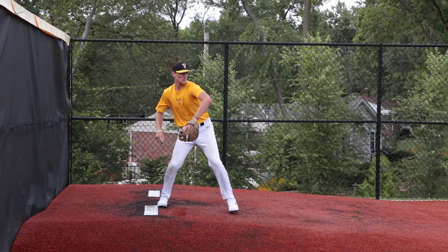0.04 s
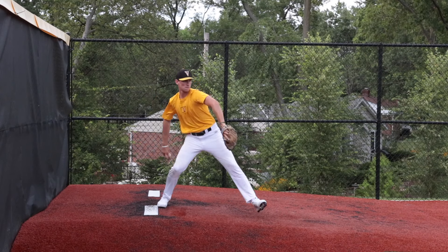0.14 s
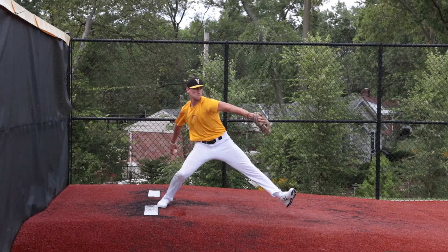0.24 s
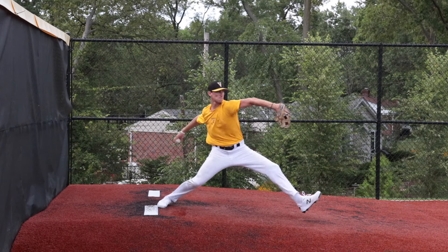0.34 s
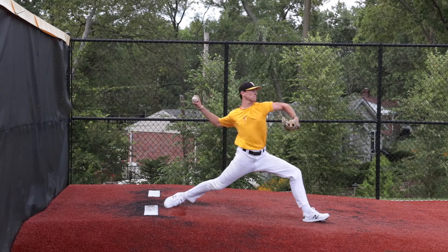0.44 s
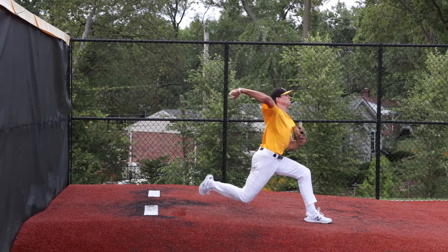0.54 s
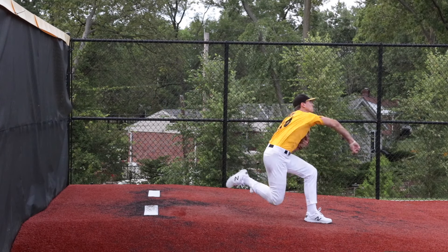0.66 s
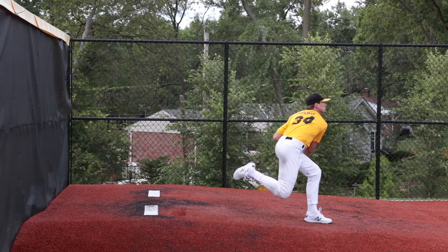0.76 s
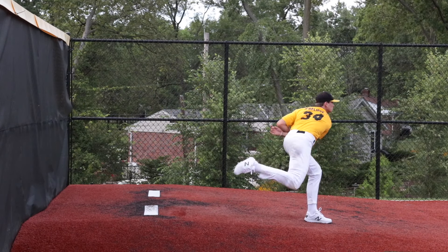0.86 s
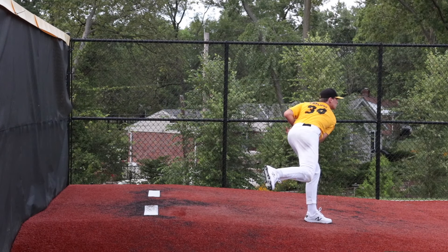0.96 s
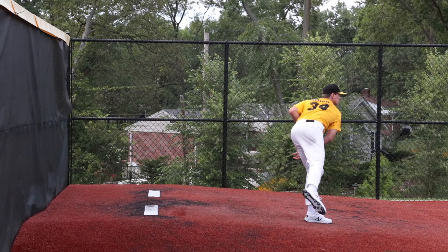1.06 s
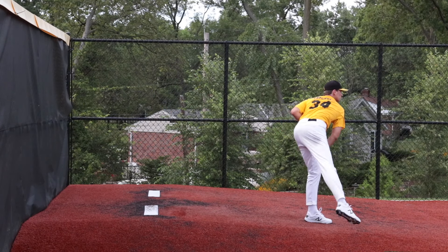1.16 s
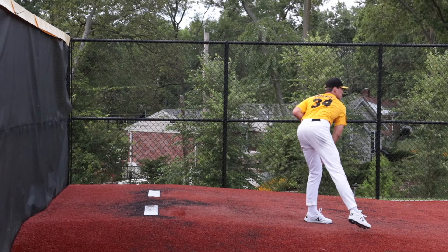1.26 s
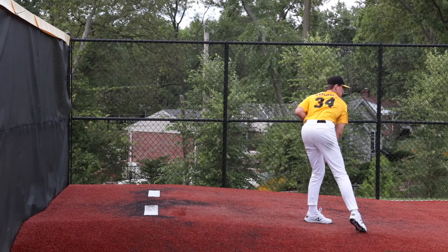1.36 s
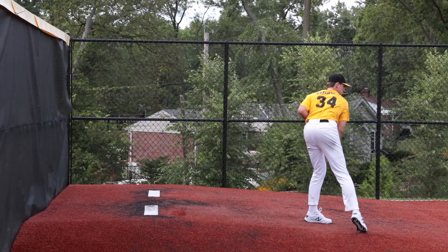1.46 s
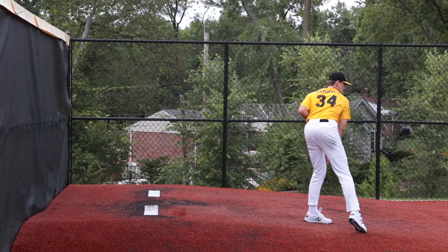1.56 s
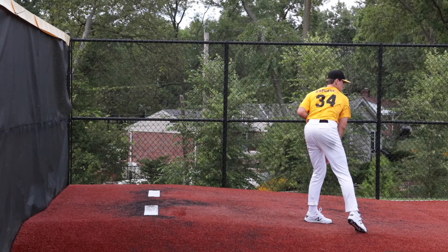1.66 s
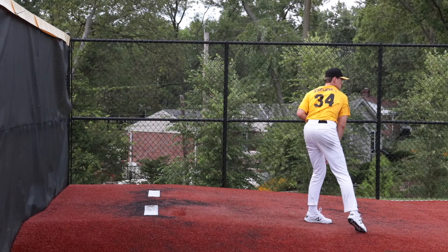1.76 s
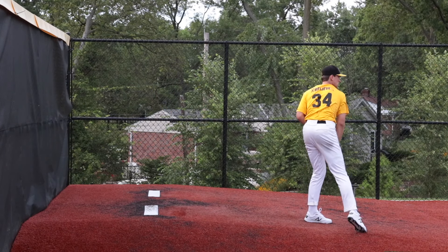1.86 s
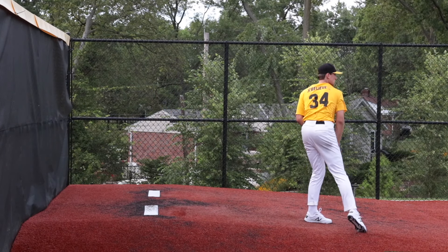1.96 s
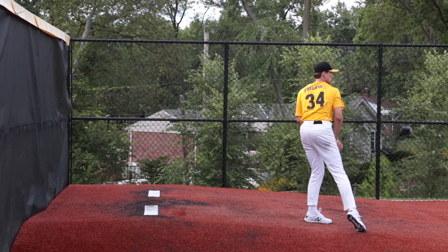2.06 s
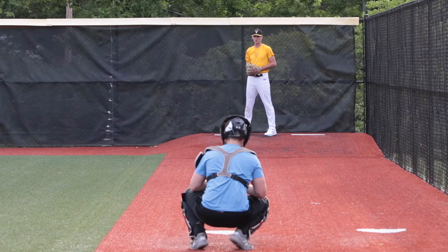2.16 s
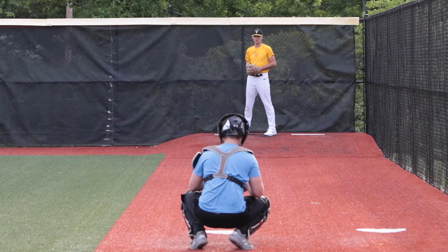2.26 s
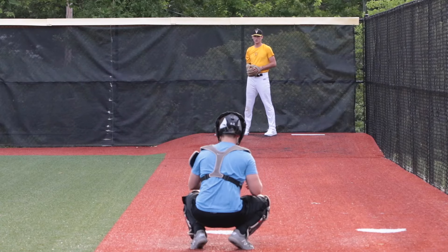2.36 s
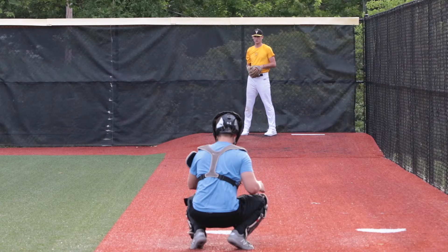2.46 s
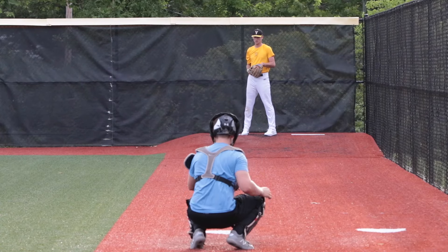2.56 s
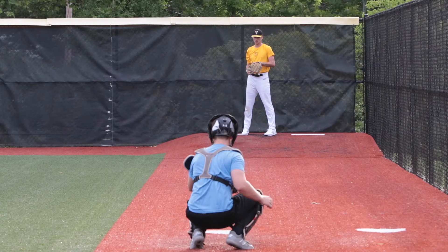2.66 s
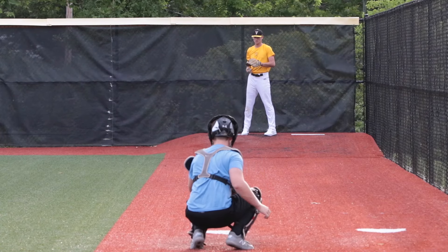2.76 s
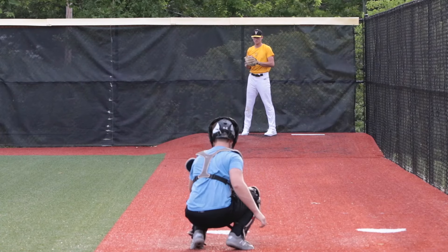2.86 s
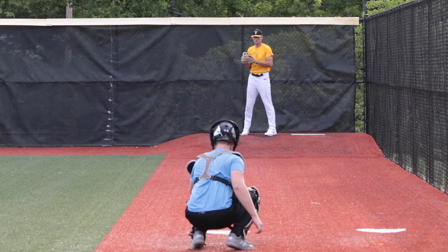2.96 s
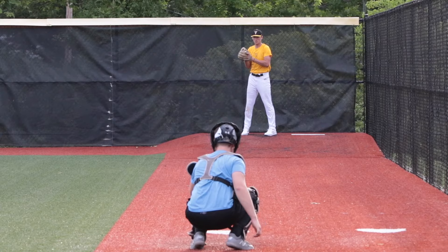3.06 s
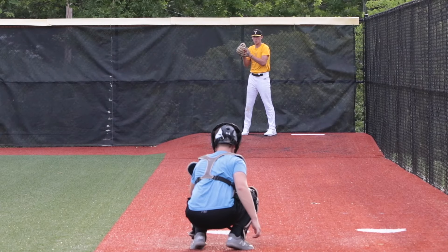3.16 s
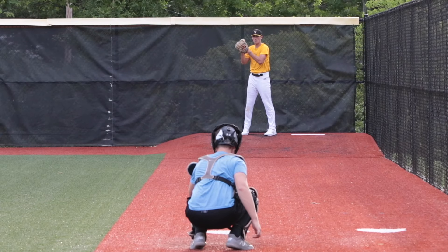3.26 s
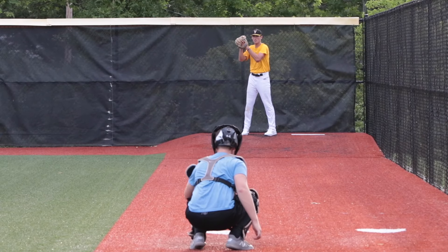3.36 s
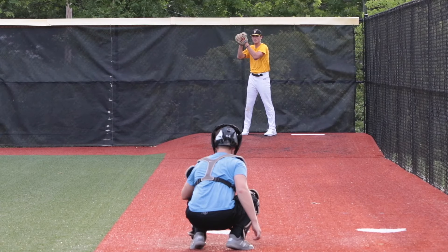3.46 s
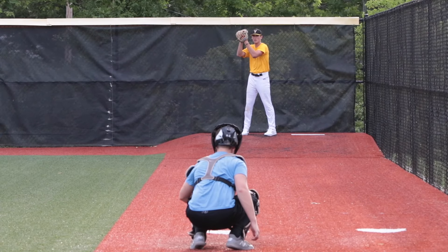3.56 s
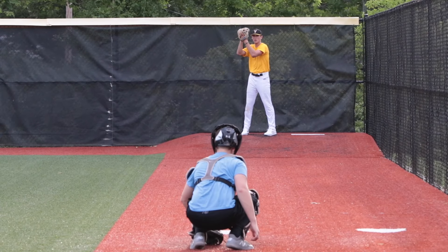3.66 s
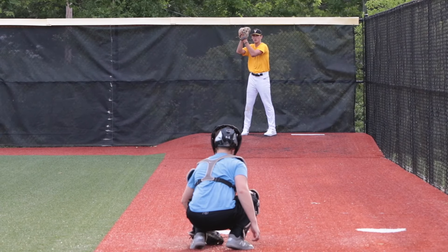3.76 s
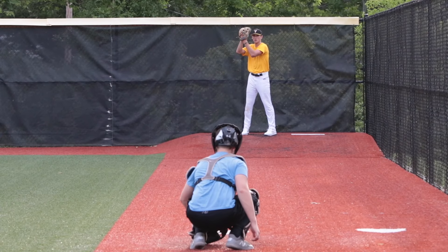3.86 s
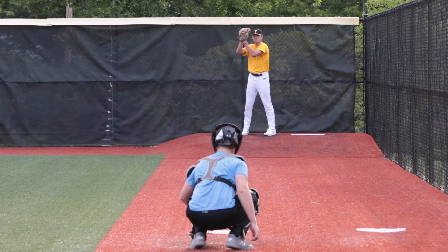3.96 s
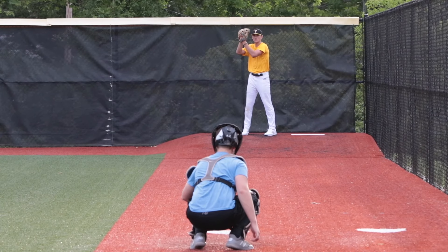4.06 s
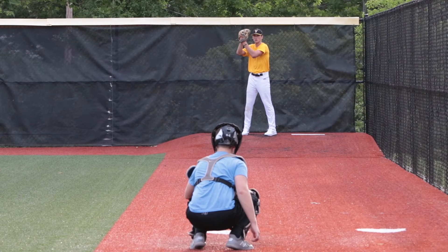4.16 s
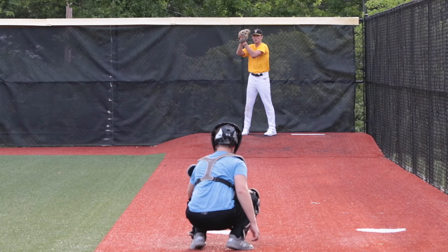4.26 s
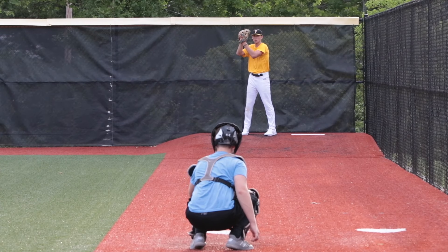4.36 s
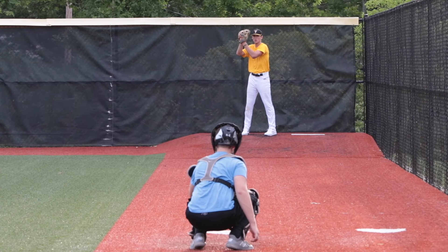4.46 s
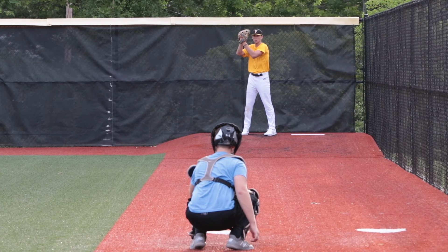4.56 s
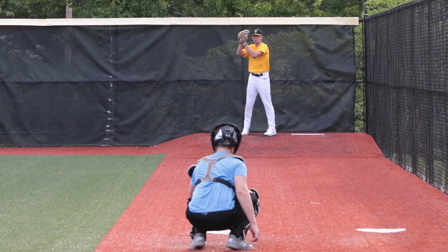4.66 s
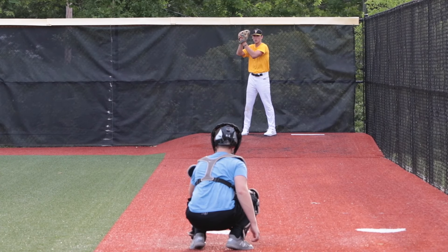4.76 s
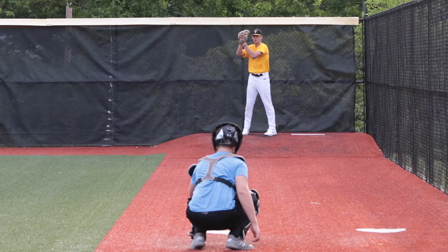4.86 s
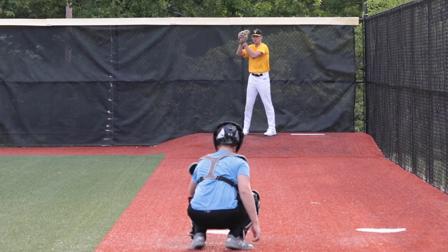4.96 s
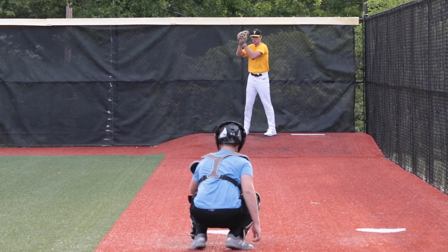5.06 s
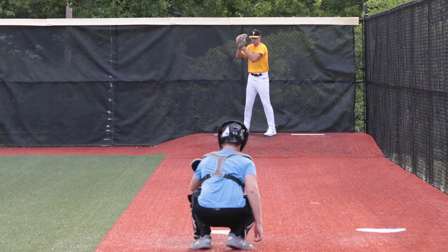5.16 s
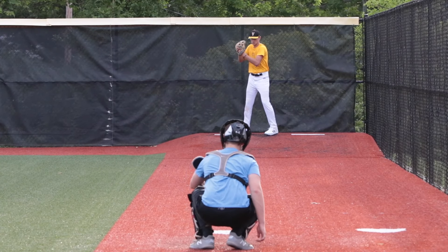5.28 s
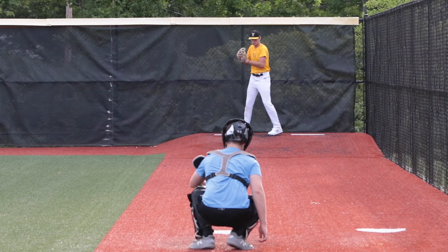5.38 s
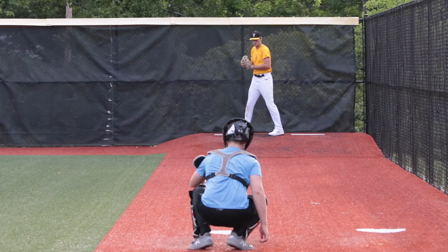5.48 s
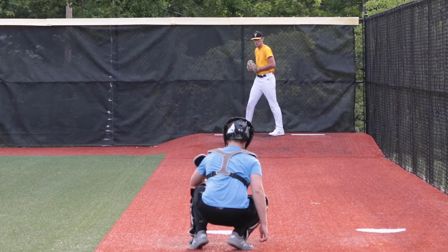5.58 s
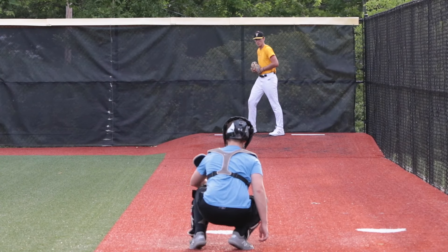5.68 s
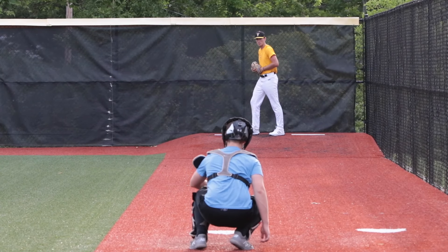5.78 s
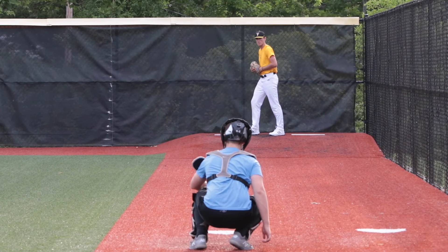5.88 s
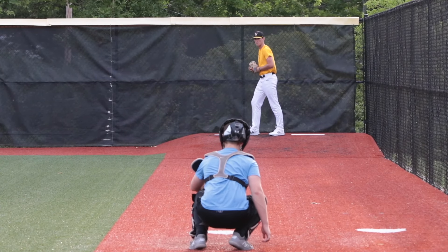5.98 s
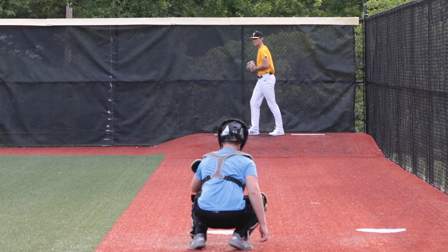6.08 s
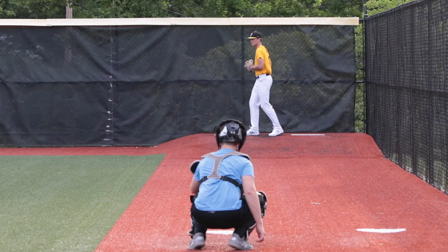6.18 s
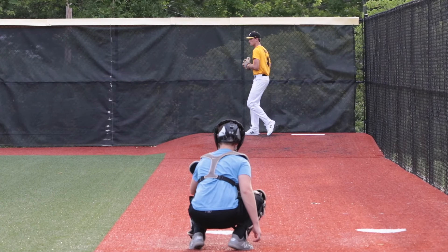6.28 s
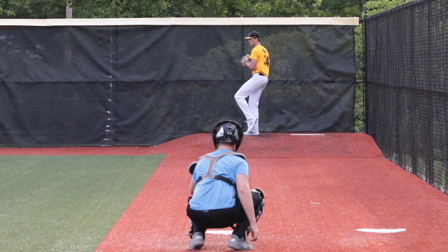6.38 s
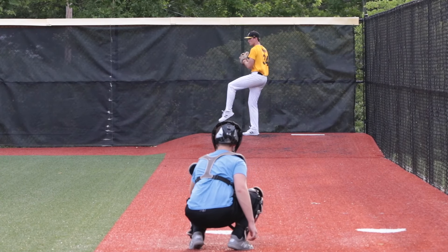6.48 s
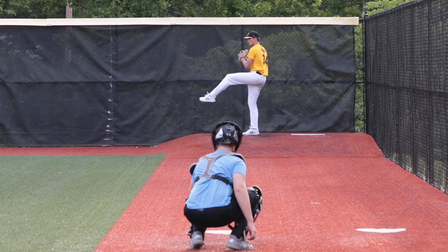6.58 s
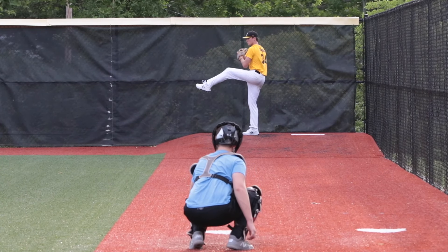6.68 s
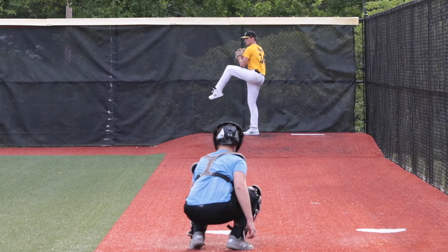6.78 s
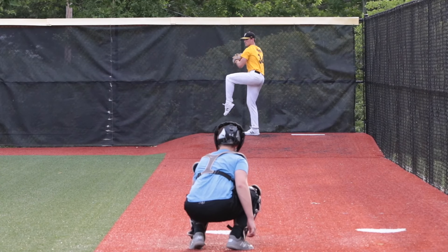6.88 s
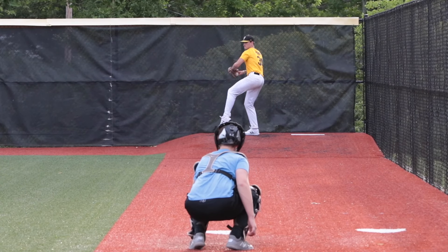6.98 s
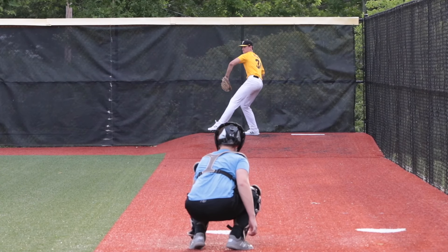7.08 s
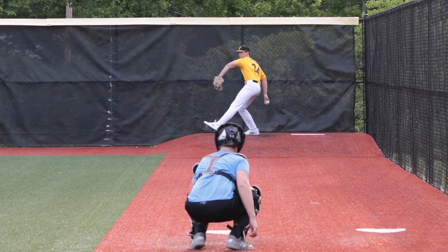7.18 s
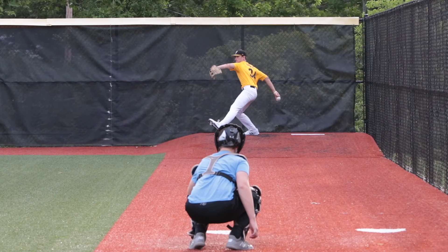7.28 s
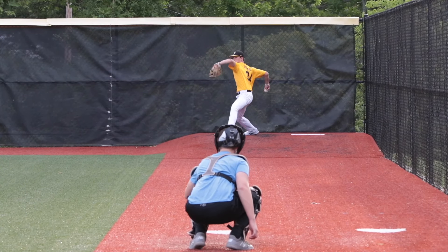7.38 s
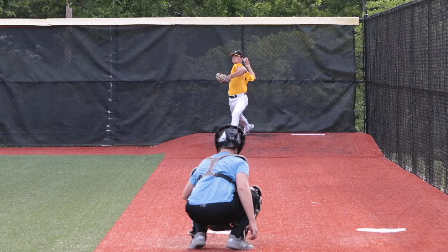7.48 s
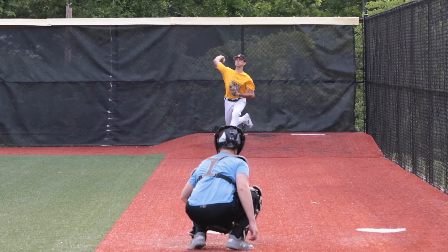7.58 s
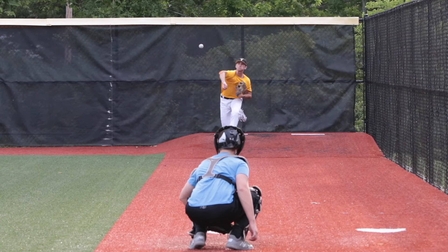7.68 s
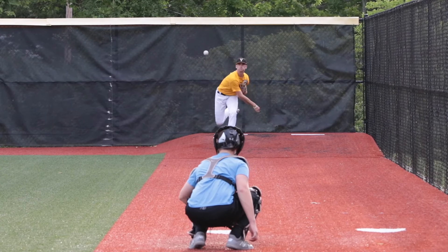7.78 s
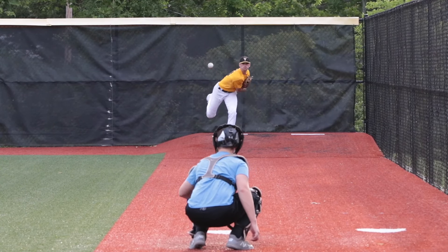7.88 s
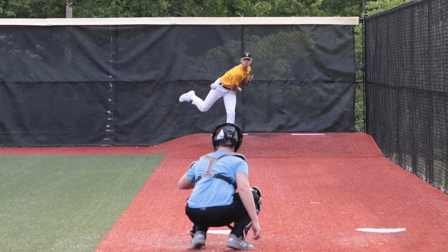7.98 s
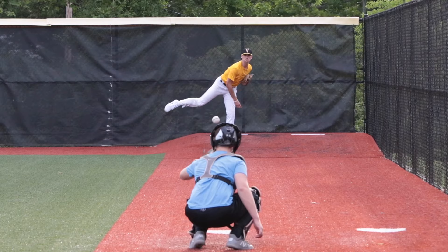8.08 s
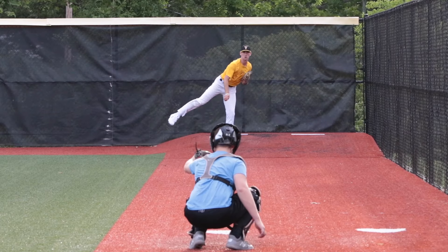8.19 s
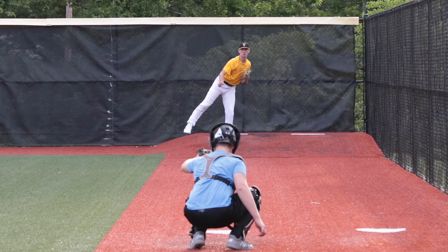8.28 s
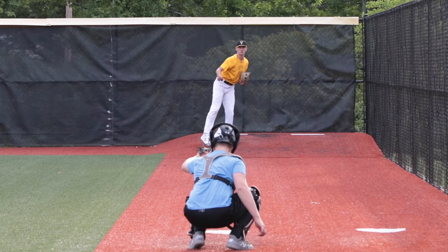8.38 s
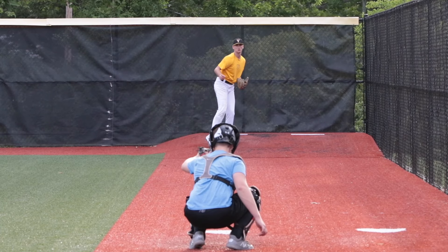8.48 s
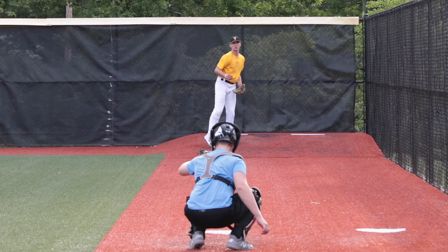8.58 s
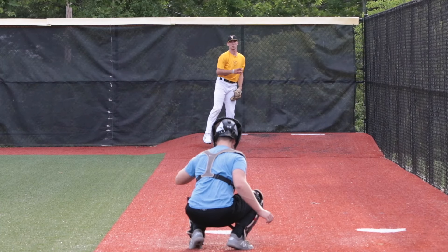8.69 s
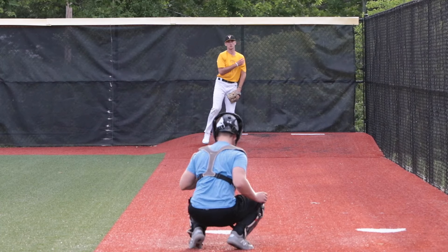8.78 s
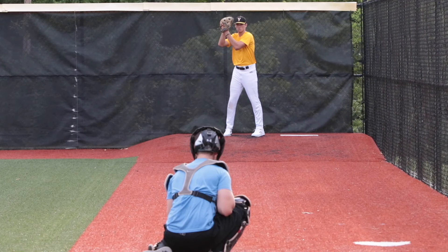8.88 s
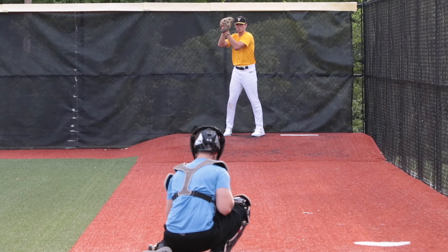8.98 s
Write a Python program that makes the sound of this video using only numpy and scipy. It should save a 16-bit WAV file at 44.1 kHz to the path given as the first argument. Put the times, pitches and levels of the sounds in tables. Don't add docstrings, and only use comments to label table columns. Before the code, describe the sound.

On a fenced ball field, a hard mitt pop, later a far bat ping and a closer pop, over pulsing cicadas and wind buffeting.

```python
import sys
import numpy as np
from scipy import signal
from scipy.io import wavfile
from scipy.ndimage import uniform_filter1d

SR = 44100
rng = np.random.default_rng(int(sys.argv[2]) if len(sys.argv) > 2 else 0)


def natural_amplitude(level_db):
    exponent = np.asarray(level_db, float) / 20
    return 10 ** exponent


def store_wav(level_fs):
    pcm = np.round(np.clip(np.atleast_2d(level_fs), -1, 1) * 32767)
    wavfile.write(sys.argv[1], SR, pcm.T.astype(np.int16))


N = 398663
CUT_S = 2.17


def evened(x):
    return x / np.sqrt(np.mean(x ** 2) + 1e-20)


def read(points, hz):
    f, value = np.transpose(points)
    return np.interp(np.log(hz + 1), np.log(f + 1), value)


def add(mix, start_s, sound):
    part = mix[round(start_s * SR):][:len(sound)]
    part += sound[:len(part)]


def resonate(x, hz, width_hz):
    turn = np.exp(2j * np.pi * np.cumsum(hz * np.ones(len(x))) / SR)
    r = np.exp(-np.pi * width_hz / SR)
    return 2 * (turn * signal.lfilter([1 - r], [1, -r], x / turn + 1e-18)).real


def drift(length_s, count=N):
    span = max(int(length_s * SR), 1)
    noise = rng.standard_normal(count)
    return evened(uniform_filter1d(uniform_filter1d(noise, span), span))


def strikes(blows, modes, order):
    out, t = np.zeros(N), np.arange(SR // 8) / SR
    for start_s, db, dull_db in blows:
        ring = np.zeros(len(t))
        for hz, mode_db, crest_s in modes:
            level = natural_amplitude(mode_db - dull_db * np.log2(hz / 1500))
            swell = (t / crest_s * np.exp(1 - t / crest_s)) ** order
            ring += level * swell * np.cos(2 * np.pi * hz * (t - crest_s))
        add(out, start_s, -natural_amplitude(db) * ring)
    return out


# start in seconds, level in dB, dullness in dB per octave.
FAR_BLOWS = [
    (1.2801, -1.5, 1.2),
    (1.2885, -17, 1.2),
]
NEAR_BLOWS = [
    (8.2981, -16, 2),
    (8.3002, -.7, 2.9),
    (8.3063, -17, 4),
]
# frequency in Hz, level in dB, time to the crest in seconds.
FAR_MITT = [(227, -16.5, 0.004), (380, -26, 0.0013), (790, -16, 0.00092), (1600, 0.5, 0.000885),
            (2770, -6.5, .0008), (4490, -5, 0.00096), (5340, -0.5, 0.00103), (6500, -4.5, 0.000757),
            (8250, -11, 0.00078), (10000, -14, 0.00077), (12000, -13, 0.00068), (14800, -23, 0.00061)]
NEAR_MITT = [(810, -10, 0.00056), (1300, -4.5, 0.0007), (3860, -10.5, 0.00057), (5170, -14, 0.00052),
             (7260, -15.5, .0005), (10200, -24, .0005), (13500, -42, .0005)]


def catches():
    return strikes(FAR_BLOWS, FAR_MITT, order=4) + strikes(NEAR_BLOWS, NEAR_MITT, order=4)


# start in seconds, level in dB, dullness in dB per octave.
PALM_BLOW = [
    (8.2985, 0, 0),
]
POCKET_BLOW = [
    (8.3012, -25, 0),
]
# frequency in Hz, level in dB, time to the crest in seconds.
PALM = [(324, -13.5, 0.003), (190, -20.5, 0.0037)]
POCKET = [(3900, 0.5, .002), (2400, -6, .0015), (370, 4, .005), (230, 1.5, .005), (950, 5, .002)]


def palm_and_pocket():
    return strikes(PALM_BLOW, PALM, order=4) + strikes(POCKET_BLOW, POCKET, order=2)


# start in seconds, level in dB, dullness in dB per octave.
PINGS = [
    (6.0455, -19, 2),
    (6.0467, -13.5, 0.6),
]
# frequency in Hz, level in dB, time to the crest in seconds.
BAT = [(1200, -21, 0.0052), (2900, -5.5, 0.00047), (3500, -8, 0.00042), (4350, -12, .0005),
       (5200, -7, .0005), (5720, -0.5, 0.00061), (7000, -20, .0006)]


def bat():
    return strikes(PINGS, BAT, order=1)


# start in seconds, level in dB, dullness in dB per octave.
FOOTFALL = [
    (.704, -36, 0),
]
# frequency in Hz, level in dB, time to the crest in seconds.
MOUND = [(410, 0.5, .008), (250, -9, .008)]


def footfall():
    return strikes(FOOTFALL, MOUND, order=2)


def burst(out, start_s, rise_s, t60_s, hz, width_hz, db):
    t = np.arange(SR // 2) / SR
    noise = rng.standard_normal(len(t))[:int(1.5 * t60_s * SR)]
    noise = resonate(resonate(noise, hz, width_hz), hz, 2 * width_hz)
    noise = evened(resonate(noise, hz / 2, 2 * hz))
    envelope = (1 - np.exp(-t / rise_s)) * natural_amplitude(db - 60 * t / t60_s)
    add(out, start_s, noise * envelope[:len(noise)])


# start in seconds, level in dB, centre in Hz, width in Hz, t60 in seconds.
RASPS = [(1.282, -22, 5500, 4000, 0.015), (1.2802, -14, 1710, 1500, 0.016), (1.289, -28, 1810, 1600, 0.13),
         (6.0462, -35, 10000, 8000, 0.081), (6.046, -34, 2700, 1200, 0.035), (6.049, -20, 5650, 900, 0.033),
         (8.3018, -19, 1200, 1400, .025), (8.3018, -32, 4600, 1500, 0.024), (8.302, -34, 6500, 2500, 0.014),
         (8.301, -42, 9000, 9000, 0.044), (8.307, -35, 1500, 2000, .05)]


def rasps():
    out = np.zeros(N)
    for start_s, db, hz, width_hz, t60_s in RASPS:
        burst(out, start_s, .0012, t60_s, hz, width_hz, db)
    return out


# start in seconds, level in dB, centre in Hz.
ECHOES = [(1.2955, -30, 3200), (1.304, -32, 3000), (1.313, -35, 5500), (1.342, -38, 3000),
          (1.36, -31, 5800), (1.292, -31, 6500), (1.4245, -29, 1300), (1.4345, -27, 1200),
          (1.465, -40, 1800), (1.468, -33, 1200), (1.66, -36, 2000), (1.684, -37, 1800), (8.325, -33, 2600),
          (8.337, -32, 1600), (8.351, -41, 1600), (8.416, -33, 1500), (8.418, -34, 4600),
          (8.506, -39, 2000)]


def catch_echoes():
    out = np.zeros(N)
    for start_s, db, hz in ECHOES:
        burst(out, start_s, .0012, .023, hz, 1600, db)
    return out


# start in seconds, level in dB.
BAT_ECHOES = [
    (6.0812, -30.5),
    (6.1275, -32),
    (6.147, -33),
]
# centre in Hz, width in Hz, level in dB.
BAT_ECHO_BANDS = [(2950, 800, -2), (5900, 1000, 0.5)]


def bat_echoes():
    out = np.zeros(N)
    for start_s, db in BAT_ECHOES:
        for hz, width_hz, band_db in BAT_ECHO_BANDS:
            burst(out, start_s, .0012, .024, hz, width_hz, db + band_db)
    return out


# start in seconds, rise in seconds, t60 in seconds, centre in Hz, width in Hz, level in dB.
FOLIAGE = [
    (1.34, 0.013, 0.36, 3900, 2600, -33.5),
    (1.338, 0.0091, 0.37, 1200, 1200, -41.5),
    (1.38, 0.073, 0.83, 3200, 3040, -39),
    (1.411, .02, .25, 950, 700, -44),
    (6.059, .01, 0.36, 5000, 6000, -50),
    (8.311, 0.027, 0.6, 3600, 3600, -40),
    (8.461, 0.03, 0.54, 2490, 2500, -45.5),
]


def foliage():
    out = np.zeros(N)
    for start_s, rise_s, t60_s, hz, width_hz, db in FOLIAGE:
        burst(out, start_s, rise_s, t60_s, hz, width_hz, db)
    return out


# start in seconds, end in seconds, top effort in dB, blur from neighbours as noise over clicks.
PHRASES = [(-.2, .52, -52, 2.5), (.7, .95, -52, 2.5), (1.05, 1.5, -52, 2.5), (1.61, 2.1, -51, 2.5),
           (2.18, 2.22, -46, .8), (2.38, 2.91, -47, .75), (3.04, 3.15, -52, .8), (3.26, 3.6, -47, .85),
           (3.75, 4.29, -47, .7), (4.46, 4.93, -48.5, 1.4), (5.16, 5.6, -47.5, 1.6), (5.86, 6.1, -50, 1.4),
           (6.3, 6.73, -52, 1.8), (6.8, 7.8, -55, 1.8), (7.98, 8.8, -49.5, 1.8), (8.88, 9.2, -45.5, 1.8)]


def phrasing(swell_db=3.0, start_db_per_s=250, stop_db_per_s=230):
    start, end, top_db, blur = np.transpose(PHRASES)[:, :, None]
    t = np.arange(0, N / SR, .002)
    db = top_db - swell_db * np.clip((end - t) / (end - start), 0, 1)
    db = db - start_db_per_s * np.maximum(start - t, 0) - stop_db_per_s * np.maximum(t - end, 0)
    sample_s = np.arange(N) / SR
    effort_db = np.interp(sample_s, t, db.max(axis=0))
    return effort_db, np.interp(sample_s, t, blur[db.argmax(axis=0), 0])


# frequency in Hz, width in Hz, level in dB.
BODY = [(4790, 290, 1), (5055, 220, 6), (5610, 330, 6), (6000, 330, 2.5)]


def cicada(sag=0.28, resting_db=-57, clicks_hz=310):
    effort_db, blur = phrasing()
    slack = np.clip((resting_db - effort_db) / 6, 0, 1)
    turns = np.cumsum(clicks_hz * (1 + .011 * drift(.02))) / SR
    clicks = np.diff(np.floor(turns), prepend=0) * natural_amplitude(1.5 * rng.standard_normal(N))
    drive = (evened(clicks) + blur * rng.standard_normal(N)) / np.sqrt(1 + blur ** 2)
    pitch = 1 - sag * slack
    body = np.zeros(N)
    for hz, width_hz, db in BODY:
        once = resonate(drive, hz * pitch, width_hz)
        body += natural_amplitude(db) * resonate(once, hz * pitch, 2 * width_hz)
    return natural_amplitude(np.maximum(effort_db, resting_db - 0.5)) * evened(body)


# time in seconds, pitch in Hz, level in dB.
NOTES = [
    [(4.94, 4700, -61), (4.97, 4100, -60)],
    [(5.14, 3700, -58), (5.162, 4600, -55)],
    [(5.235, 3600, -58), (5.255, 4400, -55)],
    [(5.315, 3200, -62), (5.335, 3900, -62)],
    [(6.0, 3500, -59), (6.04, 4150, -54), (6.08, 4520, -55), (6.16, 4520, -55), (6.185, 4450, -66),
     (6.22, 4250, -55), (6.25, 4000, -55)],
    [(6.3, 3900, -55), (6.325, 3520, -57), (6.42, 3420, -58), (6.55, 3290, -62), (6.7, 3120, -64),
     (6.78, 3050, -70), (6.93, 2940, -68)],
]


def bird():
    out = np.zeros(N)
    for rows in NOTES:
        s, hz, db = np.transpose(rows)
        t = np.arange(s[0], s[-1], 1 / SR)
        waver = 1 + .006 * drift(.006, count=len(t))
        fade = signal.windows.tukey(len(t), min(.012 / (s[-1] - s[0]), 1))
        tone = np.sin(2 * np.pi * np.cumsum(np.interp(t, s, hz) * waver) / SR) * fade
        level_db = np.interp(t, s, db) + 1.8 * drift(.008, count=len(t))
        add(out, s[0], np.sqrt(2) * tone * natural_amplitude(level_db))
    return out


# start in seconds, length in seconds, centre in Hz, width in Hz, level in dB.
SCUFFS = [(0.49, 0.16, 670, 1500, -45.5), (.545, 0.07, 420, 65, -46), (.703, 0.022, 380, 120, -45),
          (0.701, .025, 1800, 2500, -50), (2.376, 0.3, 6900, 8500, -54), (2.618, 0.1, 11000, 5000, -63),
          (2.93, .1, 11000, 6000, -62), (5.31, 0.054, 1650, 430, -52), (3.15, .5, 2100, 1300, -59.5),
          (8.55, 0.37, 1750, 1200, -58), (2.42, .2, 7400, 1500, -56), (6.2, 0.22, 640, 600, -60),
          (5.31, 0.13, 5800, 9600, -52), (7.52, 0.13, 11500, 5000, -65), (8.878, .16, 7500, 3000, -61)]


def scuffs():
    out = np.zeros(N)
    for start_s, length_s, hz, width_hz, db in SCUFFS:
        noise = rng.standard_normal((2, SR // 2))[:, :int(length_s * SR)]
        grains = noise[0] * natural_amplitude(2.1 * evened(uniform_filter1d(noise[1], 60)))
        rub = evened(resonate(resonate(grains, hz, width_hz), hz, width_hz))
        add(out, start_s, natural_amplitude(db) * rub * np.hanning(len(grains)))
    return out


# start in seconds, length in seconds, level in dB, brightness in dB per octave.
GUSTS = [ (0.03, .3, -29, 1.5), (.42, .24, -31, 1), (.78, .02, -32, 2), (.88, .15, -31, 2),
         (1.08, .2, -34, 1), (1.38, .14, -26, 2), (1.57, .2, -28, 1), (1.84, .03, -31, 1),
         (1.94, .2, -31, 1), (2.26, .5, -41, 1), (2.93, .05, -35, 7), (3.17, .2, -38, -1),
         (3.42, .25, -33.5, 4), (3.8, .22, -38, 5), (4.97, .04, -40, -5), (5.36, .06, -36, -9),
         (5.58, .23, -32.5, -7), (6.13, .15, -36, -7), (6.38, .52, -39, -4), (7.04, .04, -35, -9),
         (7.4, .2, -33, -4), (7.68, .12, -31, -1), (7.9, .14, -31, 3), (8.14, .06, -26, 1),
         (8.27, .07, -24, 0), (8.42, .1, -27.5, 3), (8.6, .26, -33, -1)]


def gusts(t, calm_db=-42.5, calm_brightness=-1.5, rise_s=.035, fall_s=.055):
    start, length, db, bright = np.transpose(GUSTS)[:, :, None]
    edge = np.maximum((start - t) / rise_s, 0) + np.maximum((t - start - length) / fall_s, 0)
    power = natural_amplitude(db) ** 2 * np.exp(-edge ** 2)
    calm = natural_amplitude(calm_db) ** 2
    total = calm + power.sum(axis=0)
    return total, (calm * calm_brightness + (power * bright).sum(axis=0)) / total


# frequency in Hz, level in dB per Hz.
WIND = [(8.8, -27), (15, 1.5), (33, 2), (57, -4), (89, -12), (171, -30.5), (200, -30.5), (231, -37),
        (260, -37), (340, -40), (570, -120)]


def wind(lumpy_db=0.3):
    hz, t, z = signal.stft(rng.standard_normal(N), SR, nperseg=4096, noverlap=3584)
    brightness = gusts(t)[1]
    shape = natural_amplitude(read(WIND, hz)[:, None] + np.log2(hz + 10)[:, None] * brightness)
    shape /= np.linalg.norm(shape, axis=0)
    rumble = evened(signal.istft(z * shape, SR, nperseg=4096, noverlap=3584)[1][:N])
    steps = np.arange(0, N / SR, .005)
    level = np.interp(np.arange(N) / SR, steps, np.sqrt(gusts(steps)[0]))
    return rumble * level * natural_amplitude(lumpy_db * drift(0.034))


# frequency in Hz, width in Hz, level in dB.
HUM = [(305.2, 9.3, -52.5), (326.4, 16.4, -54), (500, 13.6, -62.5)]


def hum():
    noise, bands = rng.standard_normal(N), np.zeros(N)
    for hz, width_hz, db in HUM:
        bands += natural_amplitude(db) * evened(resonate(resonate(noise, hz, width_hz), hz, 2 * width_hz))
    return bands * (np.arange(N) / SR > CUT_S)


# frequency in Hz, level in dB per Hz.
AIR_MOUND = [(60, -24), (100, 7), (200, -21.5), (450, -17.5), (900, -15.5), (1500, -22), (2500, -29.5),
             (3500, -21.5), (4400, -20), (5200, -17), (6400, -24), (7400, -28.5), (8700, -37), (15700, -39)]
AIR_PLATE = [(60, -27), (100, -2), (200, -4.5), (400, -18), (580, -15.5), (900, -13), (1400, -20),
             (2500, -29.5), (3400, -22.5), (4400, -19), (5300, -15.5), (6400, -24), (8600, -34),
             (15700, -37)]
# frequency in Hz, left-right likeness from 0 to 1.
LIKENESS = [(230, 1), (500, .9985), (1300, 1), (2400, .99), (3500, 1), (7600, 1), (8600, .5), (11000, .3),
            (15500, .25)]


def air(patchy_db=0.96, mound_db=-43, plate_db=-43.5):
    frames, hz = N // 256 + 5, np.fft.rfftfreq(1024, 1 / SR)
    a, b, c, patches = rng.standard_normal((frames, 513, 4)).T
    d = rng.standard_normal((frames, 513)).T
    patches = evened(uniform_filter1d(uniform_filter1d(patches, 12, 0), 14, 1))
    mound, plate = natural_amplitude(read(AIR_MOUND, hz)), natural_amplitude(read(AIR_PLATE, hz))
    mound *= natural_amplitude(mound_db) / np.linalg.norm(mound[hz > 200])
    plate *= natural_amplitude(plate_db) / np.linalg.norm(plate[hz > 200])
    at_plate = np.arange(frames) * 256 / SR > CUT_S
    colour = np.where(at_plate, plate[:, None], mound[:, None])
    likeness = read(LIKENESS, hz)
    apart = np.sqrt((1 - np.clip(likeness, 0, 1)) / (1 + likeness))[:, None]
    mid, side = a + 1j * b, apart * (c + 1j * d)
    z = np.array([mid + side, mid - side]) * colour * natural_amplitude(patchy_db * patches)
    return signal.istft(z, nperseg=1024, noverlap=768)[1][:, :N] * np.sqrt(.75)


def scene():
    blows = catches() + palm_and_pocket() + bat() + footfall()
    returns = rasps() + catch_echoes() + bat_echoes() + foliage()
    creatures = cicada() + bird()
    return air() + wind() + hum() + creatures + scuffs() + returns + blows


def roll_off(x):
    return signal.sosfilt(signal.butter(12, 16830, fs=SR, output="sos"), x)


def record(dry):
    edge = signal.firwin(511, 15800, window=("kaiser", 9), fs=SR)[None]
    mix = np.clip(signal.oaconvolve(dry, edge, "same"), -1, 1)
    return roll_off(mix)


dry = scene()
out = record(dry)
store_wav(out)
```